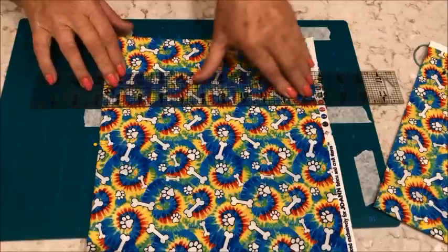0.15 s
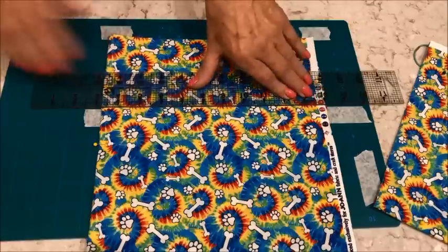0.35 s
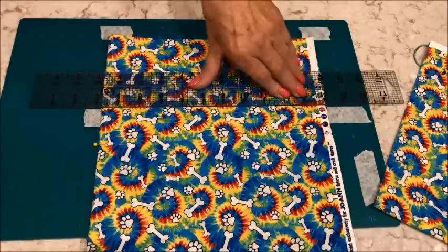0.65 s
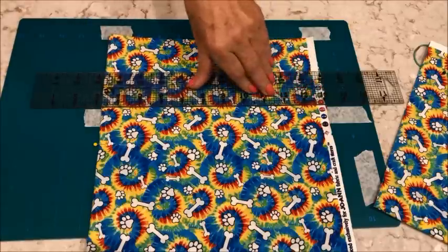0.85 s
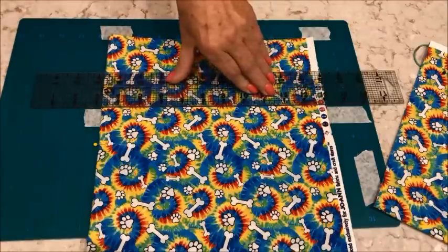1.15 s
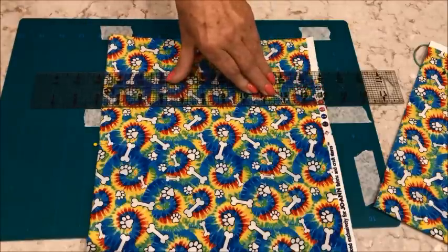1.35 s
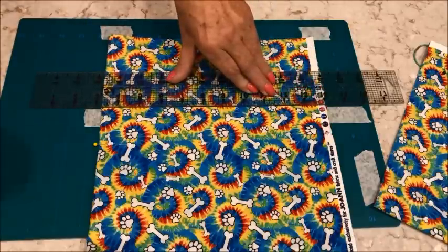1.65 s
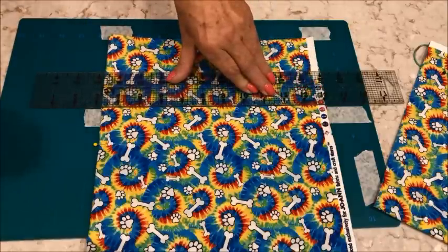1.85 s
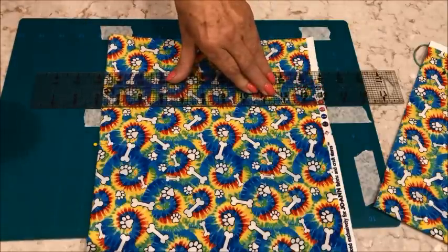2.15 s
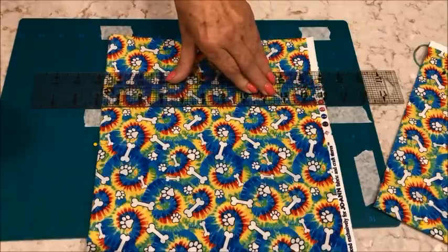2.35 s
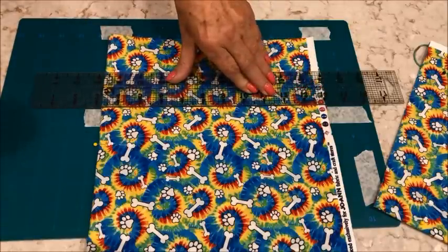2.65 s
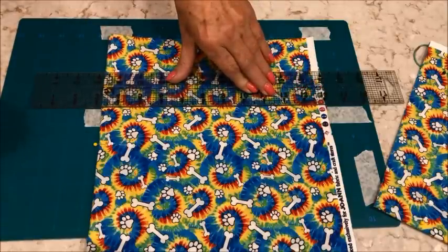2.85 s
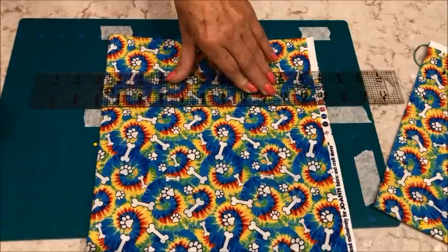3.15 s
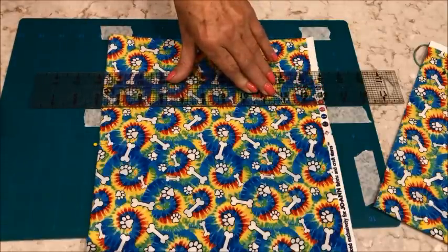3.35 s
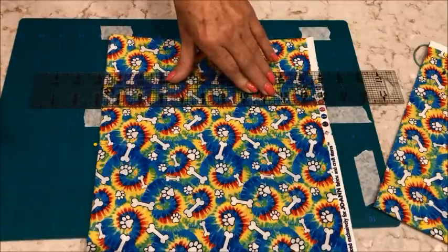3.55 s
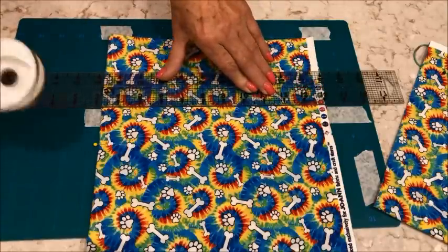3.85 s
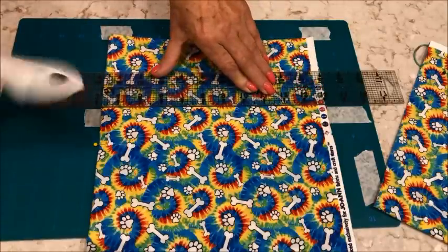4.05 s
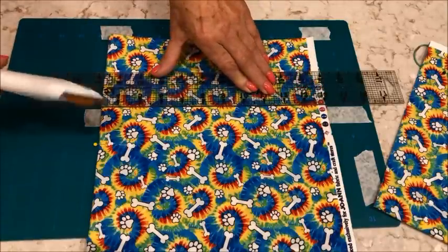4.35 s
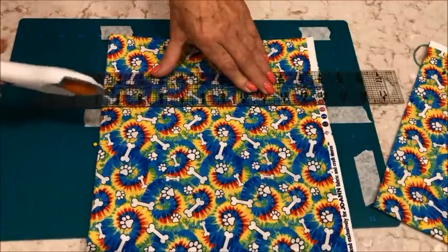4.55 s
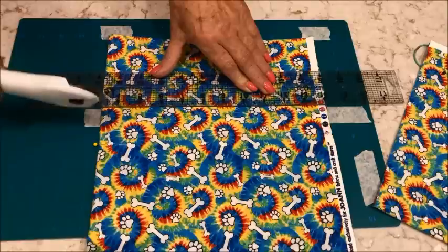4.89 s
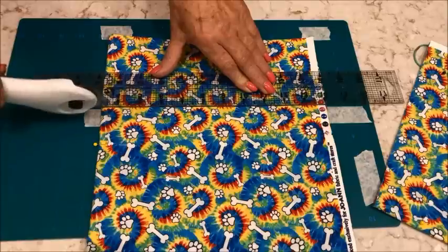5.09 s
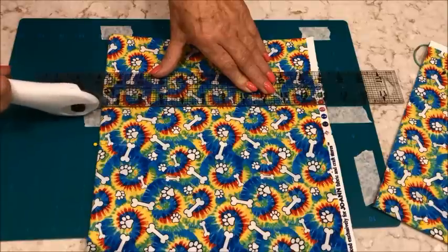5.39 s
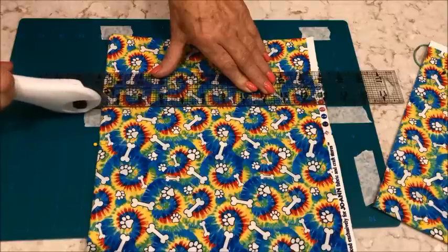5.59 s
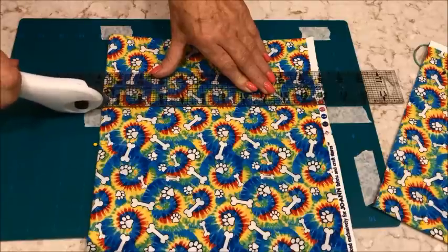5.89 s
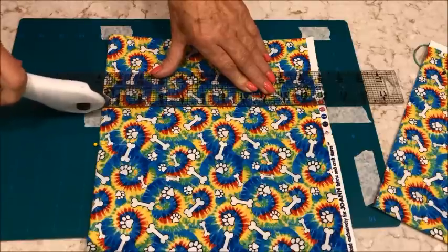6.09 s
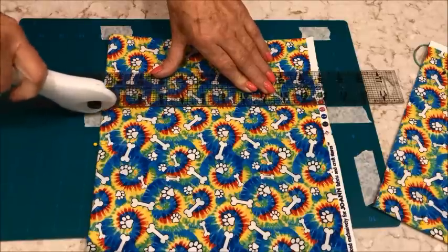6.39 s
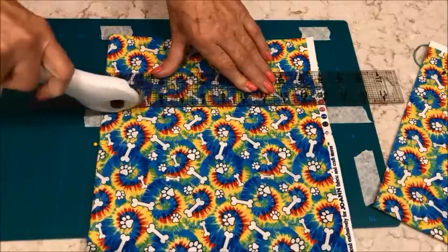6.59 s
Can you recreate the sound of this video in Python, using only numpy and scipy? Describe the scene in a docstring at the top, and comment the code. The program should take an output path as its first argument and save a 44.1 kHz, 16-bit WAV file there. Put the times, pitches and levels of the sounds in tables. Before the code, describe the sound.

Close up in a quiet, hard-surfaced room, skin brushes cotton and a plastic ruler with dry hisses, scrapes and tiny nail ticks. At about two seconds a cutter's plastic guard snaps with one loud hollow clack, followed by weaker clicks and a ratchet-like run near three seconds. More rubbing follows, then near-quiet, soft table bumps, and short crackling strokes of the blade through cloth at the end.

```python
"""A quiet hard room: hands slide and press a plastic ruler and cotton cloth on a cutting mat.
The hands make shaped noise that hisses and scrapes; nails and plastic tick as short ringing bursts.
The guard of a rotary cutter snaps in bursts that ring its modes and the hollow handle; its ratchet is
a run of short ticks. The cutter is set down with soft bumps that ring the table, and its blade crackles
through the cloth in short strokes. Echoes, faint room noise and a hum lie around it all."""
import sys
import numpy as np
from scipy import signal
from scipy.fft import rfft, irfft
from scipy.io import wavfile
from scipy.ndimage import uniform_filter1d

SR = 44100
rng = np.random.default_rng(int(sys.argv[2]) if len(sys.argv) > 2 else 0)


def waveform_to_disk(signal):
    """Save audio, clipped to [-1, 1], as 16-bit WAV at the path in sys.argv[1]."""
    frames = np.transpose(np.atleast_2d(signal))
    scaled = np.clip(frames, -1, 1) * 32767
    samples = np.round(scaled).astype(np.int16)
    wavfile.write(sys.argv[1], SR, samples)


N = 296793
TIME = np.arange(N) / SR  # seconds


def amp(db):
    """Turns decibels into gain."""
    return 10 ** (np.asarray(db) / 20)


def evened(x):
    """Scales a sound to an average strength (rms) of 1."""
    return x / np.sqrt(np.mean(x ** 2) + 1e-20)


def add(mix, s, sound):
    """Mixes a sound in, starting at s seconds."""
    part = mix[max(round(s * SR), 0):][:len(sound)]
    part += sound[:len(part)]


def coloured(x, points):
    """Filters x by a curve through (Hz, dB) points, then scales it to rms 1."""
    hz, db = np.transpose(points)
    bins = np.fft.rfftfreq(len(x), 1 / SR)
    curve_db = np.interp(np.log(bins + 1), np.log(hz), db)
    return evened(irfft(rfft(x) * amp(curve_db), len(x)))


def resonate(x, hz, width):
    """Rings x at one pitch: a two-pole resonance with gain 1 at its centre."""
    b, a = signal.iirpeak(np.clip(hz, 20, SR / 2.2), hz / width, SR)
    return signal.lfilter(b, a, x)


def gritty(count, grit_db, grain=30):
    """Noise whose strength jumps from grain to grain, as fibres catch and let go."""
    strengths = amp(grit_db * rng.standard_normal(count // grain + 1))
    sizes = np.repeat(strengths, grain)[:count]
    return evened(sizes * rng.standard_normal(count))


def patchy(x, patch_db):
    """Random patches of pitch and time swell and sink, making the noise uneven."""
    z = signal.stft(x, nperseg=256)[2]
    patches = uniform_filter1d(rng.standard_normal(z.shape), size=5, axis=0)
    patches = uniform_filter1d(patches, size=6, axis=1)
    return evened(signal.istft(z * amp(patch_db * evened(patches)), nperseg=256)[1][:N])


def contact(ms, swell):
    """A jagged burst of force that swells and dies on the time scale ms, then fades to silence."""
    t = np.arange(1500) / SR * 1000 / max(ms, .03)
    shape = t ** swell * np.exp(-(0.94 + .5 * swell) * t) * np.exp(-(t / 5) ** 4)
    return gritty(1500, 4, grain=6) * shape


def hands():
    """Skin on cloth hisses; where a nail or the ruler edge scrapes, one band stands out."""
    # Short rubs of skin and cloth. Each row: peak in seconds, hiss in dB, spread in ms,
    # scrape pitch in Hz, scrape level in dB.
    rubs = [(0.111, -70, 15, 3370, -71), (0.24, -66, 3.2, 3970, -65), (0.355, -63, 5.7, 3470, -63),
            (0.791, -69, 33, 430, -59), (0.798, -52, 6.8, 3650, -53.5), (0.846, -51.5, 17.3, 910, -60),
            (0.92, -56.5, 18, 1000, -67.5), (1.01, -62, 7.5, 3160, -69), (1.114, -88, 10, 3030, -59.5),
            (1.16, -71, 21, 990, -68.5), (1.383, -70, 7, 3600, -70), (1.473, -66, 16, 3970, -67),
            (1.684, -69, 7.2, 4470, -61.5), (1.99, -72, 15, 1130, -60.5), (2.481, -59, 13, 1428, -71),
            (2.77, -78.5, 27, 2470, -70), (2.939, -79.5, 21, 1402, -66.5), (3.289, -52, 5.2, 1390, -51.5),
            (3.405, -87, 20, 259, -64.5), (3.64, -54.5, 11, 4540, -66), (3.757, -55, 11.8, 2830, -66.5),
            (3.871, -65.5, 7.3, 5300, -60), (3.965, -63.5, 5.4, 3080, -65.5), (4.063, -55, 8.3, 3500, -63),
            (4.143, -54.5, 13, 4960, -61), (4.194, -55.5, 8.2, 3290, -58.5), (4.25, -65, 14, 1650, -69.5),
            (4.313, -70, 11, 1210, -73.5), (4.5, -87, 50, 330, -73.5), (4.602, -68.5, 9.3, 2900, -76),
            (4.69, -62, 13.7, 4750, -71.5), (4.808, -67, 8.1, 3630, -58), (4.845, -56, 21.7, 1670, -68),
            (4.97, -66, 40, 3000, -74.5)]
    # Slips, where a grip lets go at once and the cloth slides to rest. Each row: peak in seconds,
    # hiss in dB, spread in ms, scrape pitch in Hz, scrape level in dB.
    slips = [(1.103, -85, 24, 880, -55.5), (1.3, -64.5, 35, 4470, -68), (1.588, -79, 45, 3520, -60),
             (1.723, -58.5, 27, 2260, -66), (2.009, -46, 58, 4500, -51), (3.15, -57, 104, 1213, -67),
             (3.563, -63.5, 34, 2810, -64.5), (3.829, -61, 63, 5340, -69.5), (4.39, -79, 53, 2700, -71.5)]
    # Slow handling under the rubs. Each row: time in seconds, hiss in dB, dull drag in dB.
    handling = [(0.0, -72, -91), (0.58, -73.5, -70), (0.94, -63.5, -66), (1.271, -70.5, -85.5),
                (1.52, -64.5, -77.5), (2.02, -74, -69.5), (2.149, -76, -57.5), (2.53, -73.5, -73),
                (2.92, -77, -79.5), (3.18, -72, -66.5), (3.41, -79.5, -75), (4.05, -68.5, -70.5),
                (4.52, -74, -76), (5.161, -77, -81.5), (6.02, -74.5, -80), (6.73, -68, -63)]
    # Tone of the hiss. Each row: pitch in Hz, relative level in dB.
    hiss_tone = [(880, -27.5), (1500, -12.5), (2690, -3.5), (3690, -1.5), (5710, -4), (15200, -10),
                 (16000, -3.5)]
    # Tone of the dull drag. Each row: pitch in Hz, relative level in dB.
    drag_tone = [(120, -33), (200, -8), (571, -0.5), (720, 0), (1260, -5), (1440, -1.5), (2440, -2),
                 (8000, -18.5), (10400, -44), (17600, -120)]
    s, hiss_db, drag_db = np.transpose(handling)
    hiss_level = amp(np.interp(TIME, s, hiss_db))
    drag_level = amp(np.interp(TIME, s, drag_db))
    drag = drag_level * patchy(coloured(gritty(N, 0.74), drag_tone), 3.5)
    scrape = np.zeros(N)
    # a rub swells over 1.3 times its spread, a slip over a fixed 5 ms
    moves = [(1.3 * row[2], *row) for row in rubs] + [(5, *row) for row in slips]
    for rise_ms, peak, db, spread_ms, hz, scrape_db in moves:
        ms = np.arange(-4000, 12000) / SR * 1000
        swell = np.exp(-(ms / np.where(ms < 0, rise_ms, spread_ms)) ** 2 / 2)
        start = peak - 4000 / SR
        add(hiss_level, start, amp(db) * swell)
        grit = gritty(len(ms), 4.0)
        # the scraped edge rings, and the ruler under it adds its lowest mode
        edge = evened(resonate(grit, hz, 200 + 0.022 * hz))
        ruler = evened(resonate(grit, 1500, 650))
        add(scrape, start, amp(scrape_db) * swell * (edge + amp(-10) * ruler))
    hiss = hiss_level * patchy(coloured(gritty(N, 1.6), hiss_tone), 2.5)
    return hiss + scrape + drag


def ticks():
    """Each contact rings one damped spot and gives off a bright edge; faint creaks fall at random times."""
    # Small ticks of nails and plastic, the ratchet's among them. Each row: start in seconds,
    # ring level in dB, ring pitch in Hz, sharp edge level in dB.
    tick_list = [(0.1113, -38.5, 3100, -63), (0.12, -44.5, 3030, -43), (0.36, -46, 3380, -53),
                 (0.7957, -40, 3700, -50), (0.8546, -45, 4040, -57), (1.0988, -45.5, 3200, -58),
                 (1.7215, -47, 5460, -59), (2.0053, -55, 5090, -29.5), (2.9324, -53.5, 1473, -58),
                 (2.951, -52, 1480, -50), (2.974, -44.5, 1490, -47), (2.991, -46, 1430, -50),
                 (3.0026, -46.5, 3180, -51), (3.0359, -49, 3300, -44), (3.06, -46.5, 2450, -44),
                 (3.0965, -42, 3040, -41), (3.207, -59, 1413, -53), (3.2404, -39.5, 8500, -43),
                 (3.361, -47.5, 2140, -55), (3.3967, -51, 2296, -55), (3.416, -53.5, 2660, -54),
                 (3.5598, -52.5, 2710, -55), (3.5918, -52, 6500, -44.5), (3.8235, -54, 3100, -55),
                 (4.4562, -51.5, 2430, -58.5), (4.86, -43.5, 5350, -53), (5.083, -59.5, 1853, -54),
                 (5.4428, -48, 4720, -50), (5.4491, -44.5, 5080, -48), (5.6338, -54, 2276, -52.5),
                 (5.664, -47, 3143, -41), (5.7102, -62, 2693, -49.5), (5.7227, -37, 2180, -49.5),
                 (6.0805, -60.5, 3480, -53), (6.109, -59.5, 1400, -58), (6.297, -54.5, 1370, -49),
                 (6.356, -51.5, 3910, -50.5), (6.403, -56.5, 1250, -55), (6.4422, -51.5, 1240, -59.5),
                 (6.482, -48, 1270, -58), (6.6585, -66, 1350, -38), (6.6803, -61, 1430, -53)]
    blow_ms, edge_ms = 1, 1.1  # time scales of the blow and of the rattling edge
    out = np.zeros(N)
    for s, db, hz, edge_db in tick_list:
        force = contact(blow_ms, 0.55)
        width = 230 + .35 * hz  # Hz
        ring = resonate(resonate(force, hz, width), hz, 2 * width)
        edge = resonate(contact(edge_ms, 0.5), 2400, 6000)
        add(out, s, amp(db) * ring / abs(ring).max() + amp(edge_db) * edge / abs(edge).max())
    # about 30 creaks a second, of uneven strength
    creaks = (rng.random(N) < 30 / SR) * amp(-64 + 4 * rng.standard_normal(N))
    crumb = resonate(contact(0.17, 0.92), 1800, 3000)
    return out + signal.oaconvolve(creaks, crumb / abs(crumb).max())[:N]


def guard(force, tilt_db, hollow_db):
    """Rings each mode of the guard and the handle's cavity by its own force, with a set share of energy."""
    # Modes of the plastic guard. Each row: pitch in Hz, width of the first of two
    # resonances in Hz, level in dB before the tilt.
    guard_modes = [(520.3, 400, -13.5), (1240, 430, -3), (1654.5, 500, -16), (2340, 440, 0.5),
                   (2960, 900, -8.5), (4370, 540, -8.5), (4870, 2300, -9), (7300, 1100, -21.5),
                   (9430, 750, -8), (11100, 2200, -20), (14500, 2500, -21)]
    # the tilt, in dB per octave, turns around 3000 Hz
    modes = [(hz, w, db + tilt_db * np.log2(hz / 3000)) for hz, w, db in guard_modes]
    modes.append((698, 14, hollow_db))  # the cavity of the handle
    rings = []
    for hz, w, db in modes:
        push = np.append(force(), np.zeros(3000))[:4096]
        ring = resonate(resonate(push, hz, w), hz, 4 * w)
        rings.append(amp(db) * np.sqrt(w) * ring / np.linalg.norm(ring))
    return np.array(rings)


def snaps():
    """Each jump of the catch clatters for a few milliseconds; the walls hear all its sides, so mode powers add."""
    # Snaps of the cutter's guard. Each row: time in seconds, level in dB, clatter length in ms,
    # tilt in dB per octave, hollow ring in dB.
    snap_list = [(2.0147, -22.5, 2.5, 0, -6), (2.0963, -4.5, 3.96, 1, -10.5),
                 (2.31, -35.5, 3.15, -2.5, -14), (2.5612, -39, 4.3, -4, 11.5), (3.13, -22, 8.8, 1.5, -1.5),
                 (3.286, -38, 8.7, -0.5, 0)]
    direct, around = np.zeros(N), np.zeros(N)
    for s, db, ms, tilt_db, hollow_db in snap_list:
        # the high swell of 2.5 makes the force build up before it peaks
        clack = guard(lambda: contact(0.46 * ms, 2.5), tilt_db, hollow_db).sum(0)
        # for the walls: the guard's modes without the cavity, rung by a single click
        modes = guard(lambda: np.eye(1, 1500)[0], tilt_db, hollow_db)[:-1]
        power = (abs(rfft(modes)) ** 2).sum(0)
        pulse = np.roll(irfft(np.sqrt(power)), 128)[:256] * np.hanning(256)
        strength = np.sqrt((clack[:round(ms * SR / 1000)] ** 2).mean())
        size = amp(db) * 0.36 / strength
        add(direct, s - .001, size * clack)
        add(around, s, size * pulse)
    return direct, around


def blade():
    """Threads part in dense crackle that rings the cutter, while the table rumbles a little after."""
    # Cutting strokes. Each row: start in seconds, length in seconds, push in dB, table rumble in dB.
    strokes = [(6.164, .13, -53, -61), (6.459, .18, -44, -56.5), (6.66, .14, -50.5, -65)]
    # Ringing of the cutter. Each row: pitch in Hz, a third of the width in Hz, relative level in dB.
    cutter_modes = [(1187, 46, -12.5), (2400, 52, -6.5), (2900, 91, 1), (3720, 88, -5.5), (5020, 83, -11),
                    (7560, 140, -7.5)]
    # Tone of the parting threads. Each row: pitch in Hz, relative level in dB.
    thread_tone = [(240, -43), (400, -10.5), (879, -14), (1180, -4.5), (1680, -11), (2880, -8.5),
                   (16000, -20.5)]
    bite_s, lift_s = 0.047, 0.037  # the push builds as the blade bites and drops as it lifts
    shake_lag_s = 0.033
    push, shake = np.zeros(N), np.zeros(N)
    for s, length, push_db, rumble_db in strokes:
        t = np.arange(0, length, 1 / SR)
        stroke = (np.minimum(t / bite_s, 1) * np.minimum((length - t) / lift_s, 1)) ** 2
        add(push, s, amp(push_db) * stroke)
        add(shake, s + shake_lag_s, amp(rumble_db) * np.sqrt(stroke))
    threads = gritty(N, 2.8, grain=12)
    body = sum(amp(db) * resonate(threads, hz, 3 * w) / np.sqrt(w) for hz, w, db in cutter_modes)
    rumble = evened(resonate(rng.standard_normal(N), 94, 180))
    cut = amp(-8) * evened(body) + amp(-7.5) * coloured(threads, thread_tone)
    return push * cut + shake * rumble


def table_ring(x):
    """The table top answers a push with its low modes, each a fading sine."""
    # Modes of the table top. Each row: pitch in Hz, level in dB, time to fade by 60 dB in seconds.
    table_modes = [(132, -4, 0.23), (198.6, -17, 0.34), (238.6, -12.5, 0.06), (421, -12.5, 0.028),
                   (93.9, -11, 0.19)]
    t = np.arange(SR // 4) / SR
    ring = sum(amp(db - 60 * t / t60) * np.sin(2 * np.pi * hz * t) for hz, db, t60 in table_modes)
    return signal.oaconvolve(x, ring)[:N]


def bumps():
    """The cutter bumps the table top with soft pushes, which ring its low modes."""
    # Bumps of the cutter. Each row: time in seconds, relative push in dB.
    bump_list = [(5.726, -54), (6.299, -67), (6.604, -51.5)]
    out = np.zeros(N)
    for s, db in bump_list:
        add(out, s + 0.003, amp(db) * np.diff(np.hanning(120)) * 3)
    return table_ring(out)


def room(x):
    """Dense echoes after a short gap, duller than the source, each band dying at its own speed."""
    # Fading of the echoes. Each row: pitch in Hz, time to fade by 60 dB in seconds.
    fading = [(250, 0.25), (660, 0.68), (1740, 0.43), (4590, 0.61), (12100, 0.3)]
    bins, t, z = signal.stft(rng.standard_normal(SR), SR, nperseg=256)
    hz, t60 = np.transpose(fading)
    fade_s = np.interp(np.log(bins + 1), np.log(hz), t60)[:, None]
    dull_db = -1.5 * np.log2(bins[:, None] / 1000 + 1)
    tail = signal.istft(z * amp(dull_db - 60 * t / fade_s), SR, nperseg=256)[1]
    # silent for just over 1 ms, then fading in over 3 ms
    tail = tail * np.clip(np.arange(len(tail)) / SR / 0.003 - .4, 0, 1)
    return signal.fftconvolve(x, tail / np.linalg.norm(tail))[:N]


def air():
    """Low room noise that wavers slightly, and a faint hum made of narrow noise, louder for a while."""
    # Tone of the room noise. Each row: pitch in Hz, relative level in dB.
    air_tone = [(15, -57.5), (25, -26.5), (70, -2), (166, -8.5), (242, -7), (326, -8.5), (503, -9),
                (1130, -21.5), (2410, -25), (2760, -36), (16000, -41)]
    louder = uniform_filter1d(1. * ((TIME > 0.8) & (TIME < 1.55)), size=4000)
    hum = evened(resonate(rng.standard_normal(N), 164, 41.0))
    noise = patchy(coloured(rng.standard_normal(N), air_tone), 1.2)
    return amp(-71.5) * noise + amp(-77 + 5 * louder) * hum


def scene():
    """The work on the mat, its echo, the table and the air."""
    clacks, around = snaps()
    near = hands() + ticks() + blade()
    small = near + clacks + amp(-13.5) * room(near + around)
    # small light things radiate no deep bass
    no_bass = signal.butter(4, 110, "high", fs=SR, output="sos")
    small = signal.sosfilt(no_bass, small)
    return (small + bumps() + air())[None]


def record(dry):
    """Two resonances lift the presence, then a low-pass filter cuts the top of the treble."""
    # Lifts from the phone and its stand. Each row: pitch in Hz, width in Hz, lift in dB.
    lifts = [(1180, 290, 6), (2400, 300, 1)]
    lifted = dry + sum((amp(db) - 1) * resonate(dry, hz, w) for hz, w, db in lifts)
    low_pass = signal.firwin(511, 15900, window=("kaiser", 9), fs=SR)  # cutoff in Hz
    return signal.oaconvolve(lifted, low_pass[None], "same")


dry = scene()
out = record(dry)
waveform_to_disk(out)
```